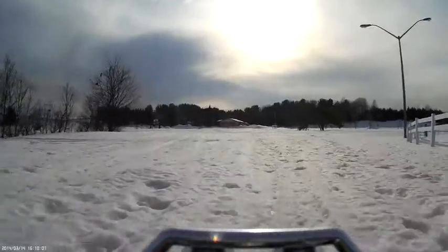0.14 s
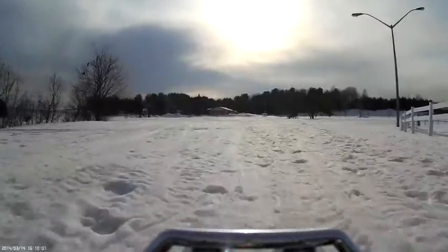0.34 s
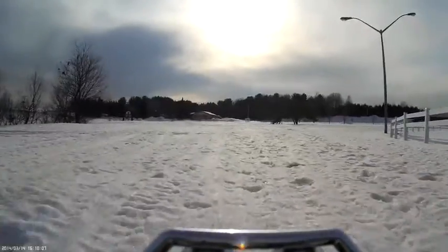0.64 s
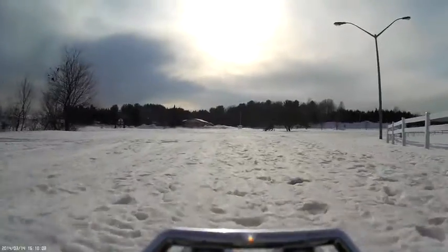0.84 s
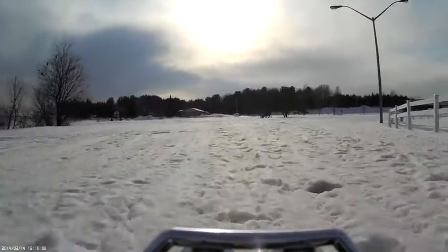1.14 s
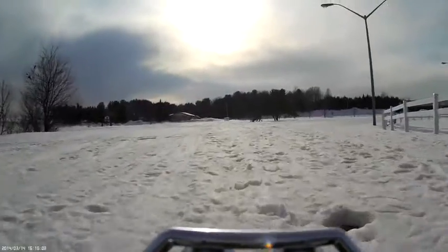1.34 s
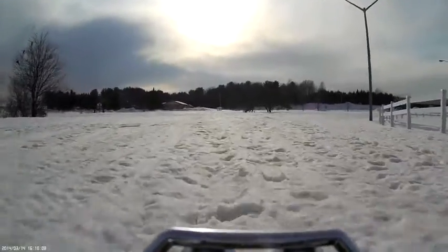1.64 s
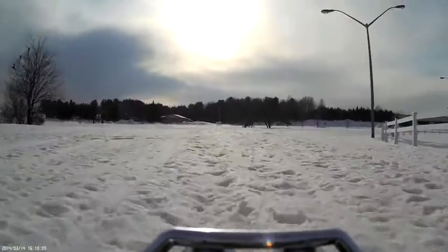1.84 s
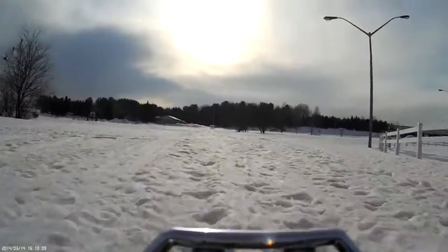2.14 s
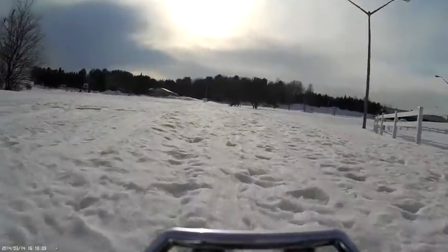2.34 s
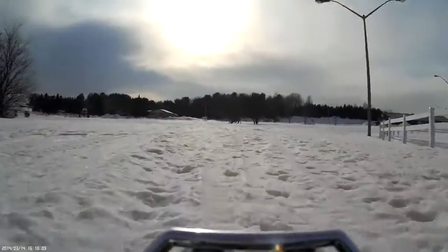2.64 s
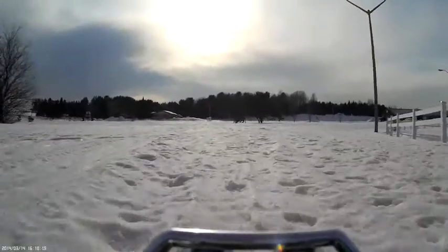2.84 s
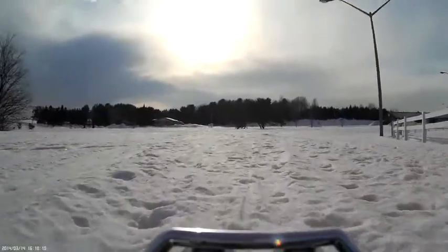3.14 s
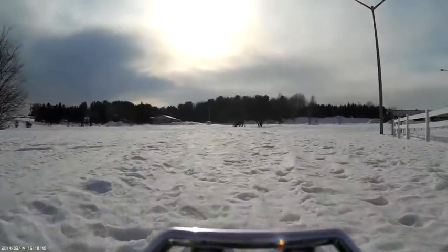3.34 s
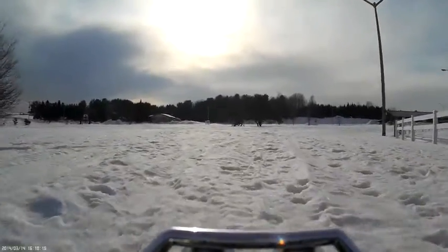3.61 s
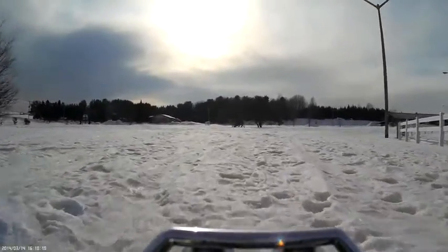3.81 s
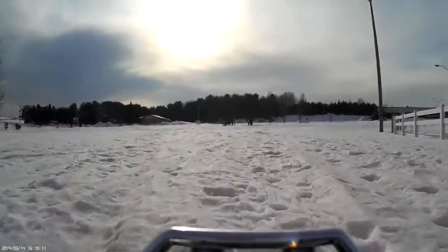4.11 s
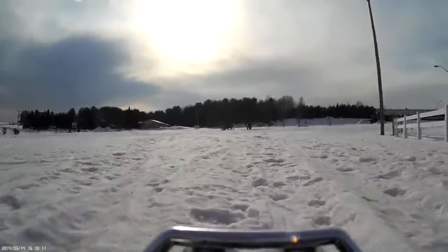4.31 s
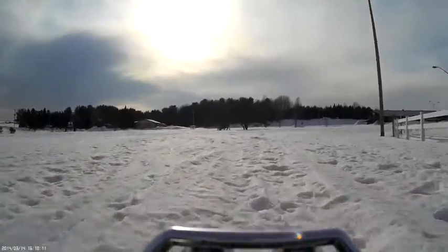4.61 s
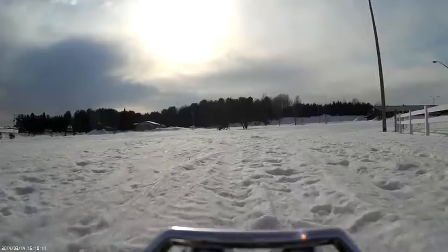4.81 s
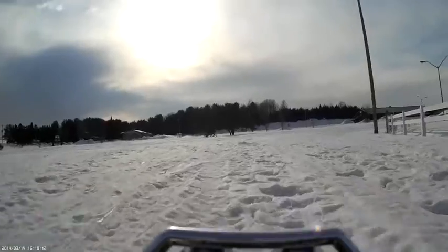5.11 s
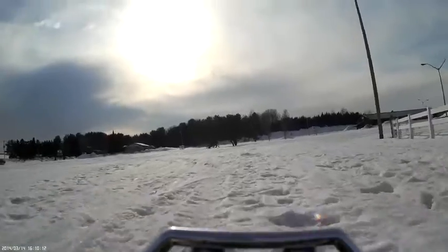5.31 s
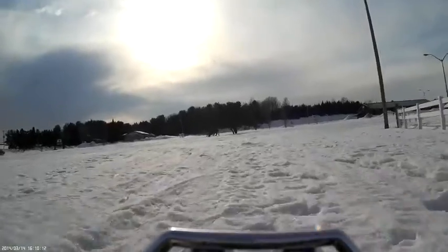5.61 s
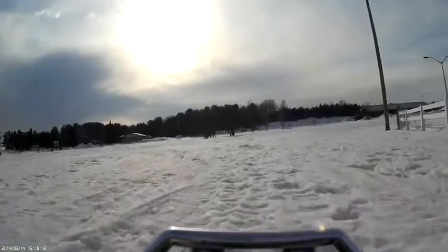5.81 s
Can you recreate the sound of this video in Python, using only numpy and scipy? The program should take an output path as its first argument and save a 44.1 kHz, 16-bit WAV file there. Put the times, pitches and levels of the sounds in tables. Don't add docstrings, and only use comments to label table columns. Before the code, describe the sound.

Heard from a mount on its chassis, a small electric truck crosses lumpy snow outdoors. Its raspy gear whine throbs about sixteen times a second with grinding pulses, dips in pitch midway as it labours harder, then rises again. Plastic rattle, low tyre rumble, faint hiss, dull thuds and muffled crunches sit underneath. Sound is close and dry, without echo.

```python
import sys
import numpy as np
from scipy import signal
from scipy.fft import rfft, irfft, next_fast_len
from scipy.io import wavfile
from scipy.ndimage import uniform_filter1d, map_coordinates

SR = 44100
rng = np.random.default_rng(int(sys.argv[2]) if len(sys.argv) > 2 else 0)


def invert_db(x):
    u = np.asarray(x, float) / 20
    return 10 ** u


def persist_wave(psi):
    counts = np.round(np.clip(psi, -1, 1) * 32767).astype(np.int16)
    wavfile.write(sys.argv[1], SR, np.atleast_2d(counts).T)


N = 262816

# centre [Hz], width [Hz], level over the slope [dB].
CASE_MODES = [(1591, 121, 7.5), (1818, 222, 9), (2224, 134, 4), (3392, 83, 9), (3750, 172, 10),
              (4060, 79, 5), (4558, 175, 7), (5240, 73, 4), (5510, 57, 5), (5830, 470, 0), (6730, 104, 4),
              (7770, 184, 8.5), (8340, 140, 12), (8880, 200, 3), (9400, 190, 8.5), (9880, 235, 11.5),
              (11470, 690, 3), (12600, 200, -1), (14500, 700, 5), (15000, 300, 4)]
USUAL_BIND_DB = 8
ROLL_THUD_DB, ROLL_CRUNCH_DB = -45, -39


def unit(x):
    return x / np.sqrt(np.mean(x ** 2) + 1e-20)


def along(points, hz):
    f, v = np.transpose(points)
    return np.interp(np.log(hz + 1), np.log(f + 1), v)


def curves(rows):
    s, *cols = np.transpose(rows)
    return [np.interp(np.arange(N) / SR, s, c) for c in cols]


def wobble(rate):
    knots = rng.standard_normal(int(N * 400 / SR) + 4)
    return map_coordinates(knots, [np.arange(N) * min(rate, 399) / SR])


def bells(s, half):
    t = np.arange(0, N, 32) / SR
    return np.exp(-.5 * ((t - s[:, None]) / half[:, None]) ** 2)


def spread(coarse):
    return np.interp(np.arange(N), 32 * np.arange(len(coarse)), coarse)


def filtered(x, response):
    m = next_fast_len(N + SR // 2)
    return irfft(rfft(x, m) * response(np.fft.rfftfreq(m, 1 / SR)), m)[..., :N]


def modes(table, f):
    power = sum(invert_db(2 * db) / (1 + ((f * f - c * c) / (w * f + 1)) ** 2) for c, w, db in table)
    return np.sqrt(power)


def gearbox(f):
    # frequency [Hz], level [dB].
    slope = [(300, -44), (700, 2), (1200, -3.5), (2000, -5.5), (3000, -2), (4200, -9.5), (6000, -14.5),
             (9000, -22.5), (12000, -28.5), (15500, -44)]
    return invert_db(along(slope, f)) * (.5 + modes(CASE_MODES, f) ** 2) ** 0.54


def drive(bind_db):
    # time [s], mesh rate [Hz].
    speed = [(0.0, 1149.0), (0.3, 1149.8), (0.6, 1130.2), (1.0, 1097.4), (1.4, 1078.5), (1.8, 1127.2),
             (2.2, 1034.7), (2.5, 1073.6), (2.8, 974.0), (3.2, 865.4), (3.6, 822.2), (3.9, 849.8),
             (4.2, 824.6), (4.6, 848.5), (4.95, 901.6), (5.3, 1006.8), (5.65, 1070.6), (5.96, 1164.8)]
    # time [s], mesh change [Hz], half length [s].
    slips = [(0.212, 44, 0.025), (0.531, 65, 0.012), (1.393, 59, 0.025), (1.869, 103, 0.012),
             (2.029, 43, 0.025), (2.162, 76, 0.012), (2.392, -81, 0.025), (2.49, -83, 0.012),
             (2.586, 71, 0.025), (2.697, 65, 0.012), (2.772, 65, 0.012), (2.888, 119, 0.012),
             (3.056, 83, 0.025), (3.132, 117, 0.012), (3.274, 56, 0.012), (3.402, 82, 0.035),
             (3.512, 60, 0.035), (3.646, 62, 0.018), (3.706, 84, 0.012), (3.855, 117, 0.012),
             (4.319, -56, 0.012), (4.444, -55, 0.025), (4.519, 56, 0.012), (4.635, -70, 0.012),
             (4.78, -36, 0.018), (5.094, 64, 0.012), (5.39, -73, 0.012), (5.718, 82, 0.012),
             (5.86, -61, 0.012), (5.912, -147, 0.012)]
    teeth, start_turn = 68, -.265
    bind_hz_per_db, bind_late_turns, wander_hz = 2.4, .09, 16

    s, change_hz, half = np.transpose(slips)
    slip_hz = spread(change_hz @ bells(s, half))
    mesh_hz = curves(speed)[0] + slip_hz
    turn = start_turn + np.cumsum(mesh_hz) / SR / teeth
    drag_hz = bind_hz_per_db * bind_db * np.cos(2 * np.pi * (turn - bind_late_turns))
    uneven_hz = wander_hz * wobble(24) - drag_hz
    tooth = np.cumsum(mesh_hz + uneven_hz) / SR
    return turn, tooth, mesh_hz, slip_hz


def slack(turn, narrow, late):
    return (.5 - .5 * np.cos(2 * np.pi * (turn - late))) ** narrow


def whine(turn, tooth, mesh_hz, slip_hz, load_db, depth_db, gap_db):
    # multiple of mesh rate, level [dB].
    overtones = [(3, 4), (4, 2.5), (5, -1), (6, -5), (7, -3.5), (8, -5), (9, -8.5), (10, -13)]
    # multiple of mesh rate, level [dB].
    motor_poles = [(0.216, -67)]
    # mesh rate [Hz], level [dB].
    first_pass = [(800, 3.5), (860, 3.5), (930, -3.2), (1040, -4.5), (1090, -5.5), (1170, 0.5)]
    # mesh rate [Hz], level [dB].
    upper_pass = [(800, -36), (880, -31), (950, -39), (1050, -35), (1150, -35.5)]

    harder_db = depth_db - USUAL_BIND_DB
    swell_db = 1.75 * wobble(15) - .025 * np.maximum(slip_hz, 0)
    level_db = -27 + load_db + swell_db
    first_db = along(first_pass, mesh_hz) - 0.51 * load_db
    upper_db = along(upper_pass, mesh_hz) + 0.7 * load_db + 1.44 * harder_db
    rough = 1.7 - .047 * load_db
    angle = 2 * np.pi * (tooth + .027 * rough * wobble(120))

    def tone(k):
        wave = np.sqrt(2) * np.sin(k * angle + .4 * rough * wobble(110))
        flutter = unit(invert_db(rough * (2.4 * wobble(100) + 1.3 * wobble(250))))
        return wave * flutter

    low = (invert_db(first_db) * tone(1) + tone(2)) / np.sqrt(invert_db(2 * first_db) + 1)
    parting_db = gap_db * slack(turn, narrow=1.6, late=.04)
    low = low * invert_db(-parting_db - 1.9 * np.cos(2 * 2 * np.pi * turn))
    high = sum(invert_db(db) * tone(round(k)) for k, db in overtones)
    high = high * invert_db(-.8 * depth_db * slack(turn, narrow=1.65, late=-0.022))
    rung = filtered(high, lambda f: gearbox(f) * (1 + modes(CASE_MODES, f) ** 2) ** .1)
    hum = sum(invert_db(db + 1.9 * wobble(33)) * np.sin(k * angle) for k, db in motor_poles)
    return invert_db(level_db - 1.0) * low + invert_db(upper_db - 4.2 + 0.3 * swell_db) * rung + hum


def grind(turn, tooth, level_db, depth_db, rumble_db):
    pinion = 14 / 68
    split_hz = 2800
    gate = 1 + .5 * np.cos(2 * np.pi * tooth) + 0.049 * np.cos(2 * np.pi * turn / pinion)

    def scrape():
        return unit(rng.standard_normal(N) * gate * invert_db(1.1 * wobble(250) + .6 * wobble(50)))

    loose = slack(turn, narrow=1.6, late=-.02)
    bright = filtered(scrape() * invert_db(level_db - depth_db * loose),
                      lambda f: gearbox(f) / np.sqrt(1 + (split_hz / (f + 1)) ** 4))
    dull = filtered(scrape() * invert_db(rumble_db - 0.022 * depth_db * loose),
                    lambda f: gearbox(f) / np.sqrt(1 + (f / split_hz) ** 4))
    return invert_db(21.5) * bright + invert_db(-17.5) * dull


def tub(turn, tooth, level_db):
    # centre [Hz], width [Hz], level [dB].
    tub_modes = [(472, 63, 1.5), (543, 47, -3), (645, 153, 4)]
    bounce_angle = 2 * np.pi * .55 * tooth
    bounce = wobble(200) * np.sin(bounce_angle) + wobble(200) * np.cos(bounce_angle)
    knocks = bounce + 5 * rng.standard_normal(N)
    knocks = knocks * invert_db(1.2 * wobble(100) - slack(turn, narrow=1, late=0))
    rung = filtered(knocks, lambda f: modes(tub_modes, f) ** 2.05)
    power = np.abs(uniform_filter1d(rung ** 2, size=SR // 2))
    return invert_db(level_db - 0.63) * rung / np.sqrt(power + 1e-12)


def footprints():
    # time [s], thud [dB], crunch [dB], half length [s].
    lumps = [(0.125, -47, -30, 0.024), (0.365, -36, -37.5, 0.023), (.59, -63, -36.5, 0.053),
             (0.887, -43, -37, 0.013), (1.208, -52, -55, 0.019), (1.534, -52, -36, 0.089),
             (1.687, -51, -39, 0.035), (2.709, -41, -34, 0.013), (2.918, -48, -35.5, 0.021),
             (3.27, -54.5, -35, .02), (3.456, -40, -55, 0.0098), (4.02, -46, -69, 0.018),
             (4.424, -43, -45.5, .025), (4.563, -43, -55, 0.062), (4.774, -35, -31.5, 0.06),
             (5.23, -42, -48.5, 0.015), (5.32, -40, -36.5, 0.028), (5.433, -36, -33.5, 0.042),
             (5.574, -36.5, -34.5, 0.026), (5.687, -42, -41, 0.058), (5.943, -42.5, -33.5, 0.061)]
    s, thud_db, crunch_db, half = np.transpose(lumps)
    humps = bells(s, half)
    thud = invert_db(ROLL_THUD_DB) + spread(invert_db(thud_db) @ humps)
    crunch = invert_db(ROLL_CRUNCH_DB) + spread(invert_db(crunch_db) @ humps)
    return thud, crunch


def wheels(thud, crunch):
    # time [s], peak [dB].
    bumps = [(0.06, -19), (0.265, -3), (0.46, -27), (0.86, -22.5), (2.682, -28), (2.883, -20), (3.439, -25),
             (3.942, -37), (4.314, -35), (4.682, -34), (5.549, -2.5)]
    # frequency [Hz], level [dB].
    thud_colour = [(20, -3), (60, 4), (130, 0), (200, -3.5), (400, -70)]
    # frequency [Hz], level [dB].
    crunch_colour = [(100, -23), (170, -5.5), (225, 2), (330, -3.5), (500, 5.5), (1000, -83), (2000, -60)]
    # frequency [Hz], level [dB].
    hiss_colour = [(2000, -47), (4000, -6), (8000, -25), (12000, -24), (15500, -36)]

    def noise(colour):
        return unit(filtered(rng.standard_normal(N), lambda f: invert_db(along(colour, f))))

    jolts = np.zeros(N + SR)
    t = np.arange(SR // 10) / SR
    for s, db in bumps:
        jolts[round(s * SR):][:len(t)] += invert_db(db - 19.0 - 60 * t / 0.044) * (1 - np.exp(-t / 0.003))
    rumble = thud * invert_db(1.9 * wobble(14)) * noise(thud_colour)
    crushing = (crunch * invert_db(1.9 * wobble(17)) + jolts[:N]) * noise(crunch_colour)
    return rumble + crushing + invert_db(-49) * noise(hiss_colour)


def grit():
    # time [s], peak [dB].
    ticks = [
        (2.145, -27),
    ]
    out = np.zeros(N + SR)
    t = np.arange(SR // 50) / SR
    for s, db in ticks:
        out[round(s * SR):][:len(t)] += invert_db(db + 3 - 60 * t / .012) * rng.standard_normal(len(t))
    return filtered(out[:N], lambda f: 1 / np.sqrt((1 + (7000 / (f + 1)) ** 6) * (1 + (f / 12000) ** 4)))


def scene():
    # time [s], load over free running [dB],
    # how hard the tight arc binds [dB], how far the teeth part when slack [dB].
    effort = [(0, 1, 8, 2.5), (.7, -1, 7.5, 3), (.9, 3, 7.5, 2), (1.5, -0.3, 9.5, 3), (2, 0.5, 8.5, 3),
              (2.4, 3, 7.5, 6), (2.6, 5, 7.5, 15), (2.7, 9, 8.5, 12), (3.1, 8.5, 8, 8), (3.5, 9.5, 6, 6),
              (4.2, 8.5, 6, 3), (4.84, 7.5, 6, 4.5), (4.87, 10.5, 9, 1), (5.05, 10, 5, 7), (5.09, 8, 10, 8),
              (5.4, 6.5, 10.5, 2.5), (5.65, 7, 10.5, 8), (5.96, 2.5, 13, 3)]
    load_db, bind_db, gap_db = curves(effort)
    harder_db = bind_db - USUAL_BIND_DB
    turn, tooth, mesh_hz, slip_hz = drive(bind_db)
    thud, crunch = footprints()

    grind_db = -40 + 1.14 * harder_db + 1.26 * wobble(15)
    rumble_db = 1.24 - 0.22 * load_db
    gears = whine(turn, tooth, mesh_hz, slip_hz, load_db, bind_db, gap_db)
    gears = gears + grind(turn, tooth, grind_db, bind_db, rumble_db)
    tub_db = -26.5 - .6 * load_db + 0.27 * harder_db + 0.37 * np.log(thud / invert_db(ROLL_THUD_DB))
    return (gears + tub(turn, tooth, tub_db) + wheels(thud, crunch) + grit())[None]


def top_cut(x):
    return signal.sosfilt(signal.butter(12, 15600, fs=SR, output="sos"), x)


def record(dry):
    top_hz, fade_hz = 15450, 350
    limited = filtered(dry, lambda f: np.clip((top_hz - f) / fade_hz, 0, 1) ** 2)
    return top_cut(limited)


dry = scene()
out = record(dry)
persist_wave(out)
```